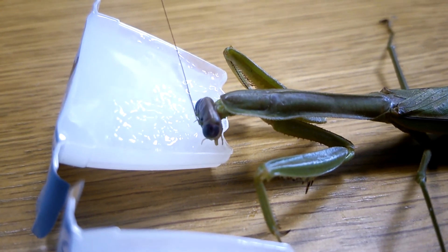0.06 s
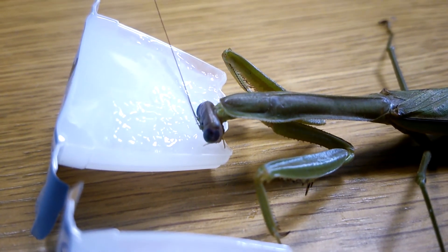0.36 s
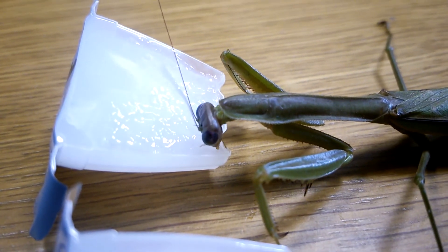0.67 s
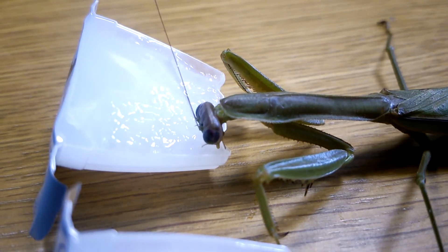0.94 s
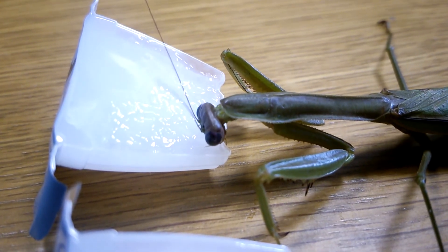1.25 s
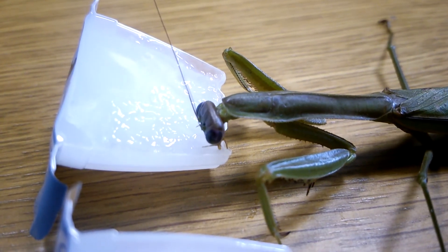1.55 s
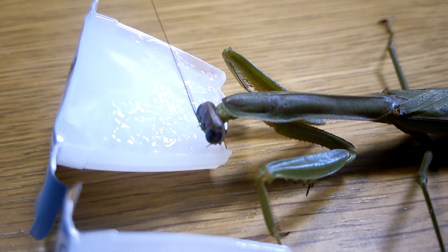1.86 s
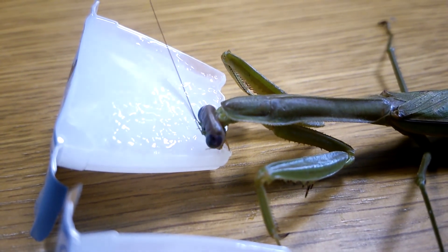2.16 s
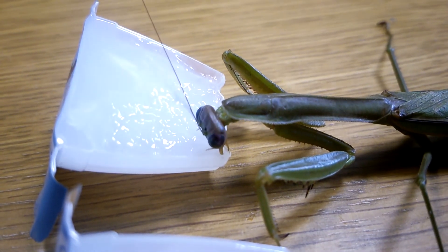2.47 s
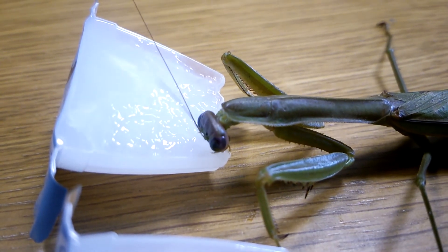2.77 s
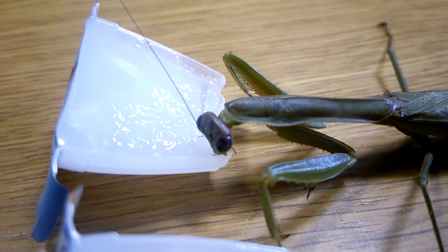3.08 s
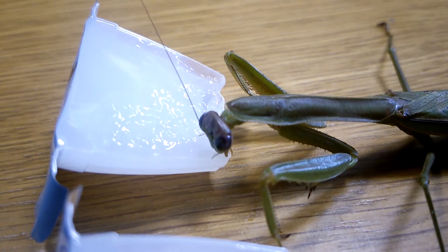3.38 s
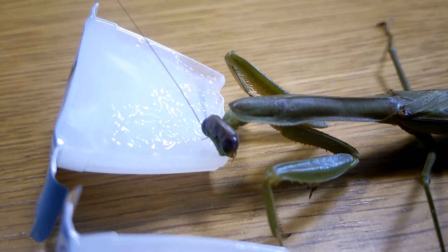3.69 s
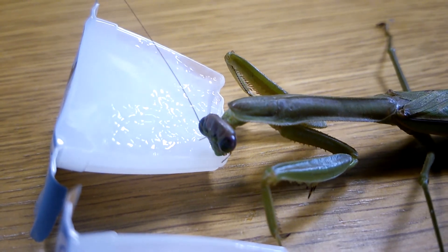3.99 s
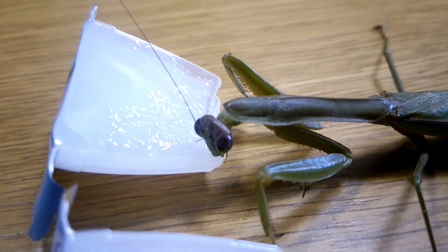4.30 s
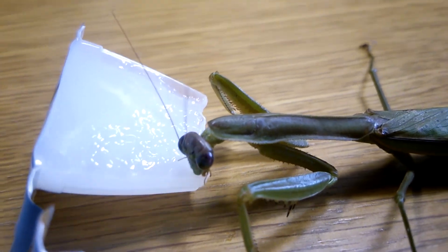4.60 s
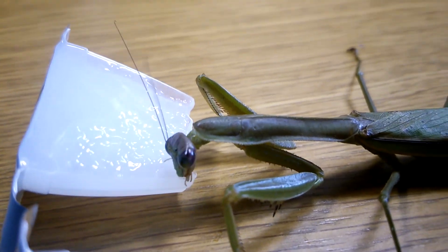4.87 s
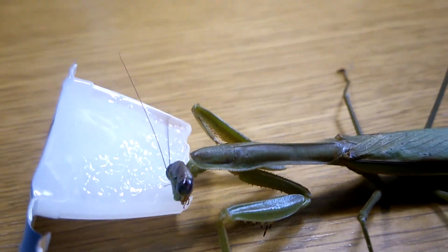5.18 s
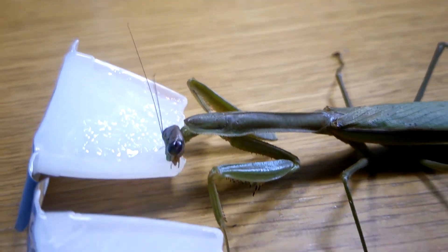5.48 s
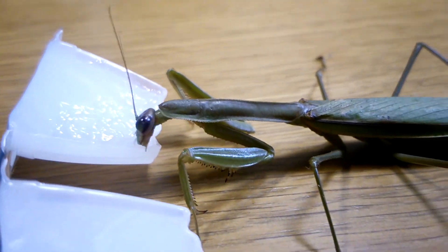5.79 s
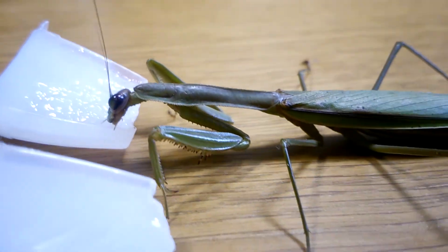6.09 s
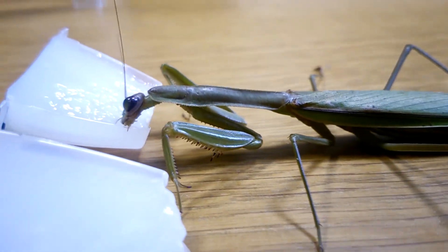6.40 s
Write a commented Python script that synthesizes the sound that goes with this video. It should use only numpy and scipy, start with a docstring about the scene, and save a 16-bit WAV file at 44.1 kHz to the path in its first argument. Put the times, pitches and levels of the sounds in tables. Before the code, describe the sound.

Small, crisp clicks come in pairs, with gaps between them, as an insect bites a plastic cup on a table, heard close up over faint indoor hum and hiss. After about four seconds, handling noise takes over on the phone's microphone: muffled knocks, a growing rumble, ticking creaks and a sharp snap from the case, then two soft finger slides.

```python
"""Pairs of dry clicks in a quiet, humming room: a mantis chews a plastic cup on a wooden table.
Each bite catches, grinds and breaks free; cup, table and walls echo it.
Then the hand holding a phone shifts: the grip rumbles and thumps, the case sticks, slips and snaps,
and a finger slides twice beside the left microphone."""
import sys
import numpy as np
from scipy import signal
from scipy.fft import rfft, irfft, next_fast_len
from scipy.io import wavfile

SR = 44100
rng = np.random.default_rng(int(sys.argv[2]) if len(sys.argv) > 2 else 0)


def int16_out(signal):
    """Quantize to a 16-bit WAV file."""
    q = np.round(np.clip(np.atleast_2d(signal).T, -1, 1) * 32767)
    wavfile.write(sys.argv[1], SR, q.astype(np.int16))


N = 284445
TIME = np.arange(N) / SR


def amp(db):
    """Decibels to gain."""
    return np.exp(np.asarray(db) * np.log(10) / 20)


def unit_rms(x):
    """Scales x so its stronger channel has an rms of one."""
    return x / np.sqrt(np.mean(x ** 2, -1).max() + 1e-20)


def add(mix, start_s, sound):
    """Adds a stereo sound into the mix."""
    part = mix[:, max(round(start_s * SR), 0):][:, :sound.shape[1]]
    part += sound[:, :part.shape[1]]


def convolve(x, response):
    """Filters each channel with its response."""
    return signal.oaconvolve(x, response, axes=1)[:, :N]


def gains(colour, hz):
    """Stereo gains at hz. Each row of a colour: frequency in Hz, left level in dB, right level in dB."""
    knots_hz, *sides = np.transpose(colour)
    return amp([np.interp(np.log(abs(hz) + 1), np.log(knots_hz + 1), side) for side in sides])


def tilted(colour, db_per_oct, pivot_hz=6000):
    """A colour made brighter or duller."""
    return [(hz, *(np.array(sides) + db_per_oct * np.log2(hz / pivot_hz))) for hz, *sides in colour]


def wander(rate_hz):
    """Random drift, unit rms."""
    steps = rng.standard_normal(4096)
    return unit_rms(np.interp(2 * rate_hz * TIME, np.arange(len(steps)), steps))


def noise(colour, shared=0., grain_db=0.):
    """Coloured stereo noise; grain_db makes its tiny impacts uneven."""
    size = next_fast_len(N, True)
    white = rng.standard_normal((2, size))
    grain = amp(grain_db * np.minimum(rng.exponential(1, size), 6))
    left, other = rfft(white * grain)
    hz = np.fft.rfftfreq(size, 1 / SR)
    coherence = np.clip(shared, 0, 1) / (1 + (hz / 900) ** 2)  # only long waves reach both sides alike
    pair = np.array([left, coherence * left + np.sqrt(1 - coherence ** 2) * other])
    return unit_rms(irfft(pair * gains(colour, hz), size)[:, :N])


def ring(colour, size=2048):
    """Minimum-phase stereo response of a body to a sharp blow, unit peak."""
    log_gain = np.log(gains(colour, np.fft.fftfreq(size, 1 / SR)))
    spectrum = np.exp(np.conj(signal.hilbert(log_gain)))
    response = np.fft.ifft(spectrum).real[:, :size // 2]
    return response / abs(response).max()


def scatter(decay_s, size=2048):
    """Dying spray of tiny impulses, unit energy per channel."""
    spray = rng.standard_normal((2, size)) * np.exp(-np.arange(size) / SR / decay_s)
    return spray / np.linalg.norm(spray, axis=1, keepdims=True)


def strokes(rows, attack_s, release_s):
    """Envelope of strokes that swell, hold and die away, summed in power."""
    power = np.zeros(N)
    for start_s, length_s, db in rows:
        t = TIME - start_s
        rise = np.clip(t / attack_s, 0, 1)
        fall = np.exp(-np.maximum(t - length_s, 0) / release_s)
        power += (amp(db) * rise * fall) ** 2
    return np.sqrt(power)


def cavities(x):
    """Cavities behind the microphone ports hold back sound near their pitch: clicks chirp and ring on."""
    # Each row: centre in Hz, width in Hz, left and right depth (1 swallows the tone, 2 returns it late).
    resonances = [(2360, 380, 1.7, 1.8), (4110, 550, 1.4, 1.72), (4015, 55, 0.34, 2.8),
                  (5880, 1050, 1.9, 1.52), (10700, 3800, 1.96, 1.91)]
    for hz, width_hz, *depths in resonances:
        held = signal.lfilter(*signal.iirpeak(hz, hz / width_hz, fs=SR), x + 1e-18)
        x = x - np.clip(depths, 0, 2)[:, None] * held
    return x


def room(floor_db=-57.0, waver_db=3.0):
    """Room noise, hiss, wavering hum of mains appliances and a faint tone that comes and goes."""
    # Noise colour and hum partials. Each row: frequency in Hz, left and right level in dB.
    floor_colour = [(20.3, -2.5, -5), (56, -14, -4.5), (89, -23, -28), (139, -32.5, -23.5),
                    (198, -32.5, -33.5), (272, -31, -29.5), (313, -27, -23.5), (368, -32.5, -30.5),
                    (463, -33.5, -38), (810, -38, -34.5), (1275, -46.5, -41.5), (3540, -46, -46.5),
                    (7600, -45.5, -47), (7800, -36, -45.5), (8250, -45.5, -48), (11200, -46.5, -41),
                    (15200, -48, -48.5)]
    hum_partials = [(120.6, -71.5, -65.5), (188, -94, -90.5), (239, -85.5, -77), (358.4, -92.5, -84.5),
                    (480, -91, -88), (535, -99, -95), (658, -99, -88)]
    # Faint tones. Each row: start in seconds, length in seconds, level in dB, pitch in Hz.
    drones = [(1.424, 0.36, -76.5, 297), (2.114, 0.086, -77, 316), (2.31, 0.195, -72, 312.6),
              (3.577, 0.67, -76.5, 296.8)]
    out = amp(floor_db) * noise(floor_colour, shared=0.49)
    drift_rad = 0.51 * wander(4.9)
    for hz, left_db, right_db in hum_partials:
        tone = np.sqrt(2) * np.sin(2 * np.pi * (hz * TIME + rng.random()) + drift_rad)
        out += amp([[left_db], [right_db]]) * tone * amp(waver_db * wander(6.1))
    for *swell, hz in drones:
        tone = np.sqrt(2) * np.sin(2 * np.pi * hz * TIME + 1.17 * wander(11))
        out += strokes([swell], attack_s=0.039, release_s=0.02) * tone
    return out


def unrest():
    """Hand motion as a gain: nearly still, then a shift of grip."""
    # Each row: time in seconds, level in dB.
    motion = [(0.0, -60), (0.36, -60.5), (1.26, -65.5), (1.76, -60), (2.22, -68), (2.45, -56.5),
              (2.95, -66), (3.3, -60.5), (3.75, -56), (3.87, -64), (4.04, -55), (4.31, -44.5), (4.67, -43),
              (4.85, -44), (5.46, -51), (5.6, -37), (5.84, -36.5), (6.34, -43.5), (6.45, -49)]
    return amp(np.interp(TIME, *np.transpose(motion)))


def grip_rumble(shared):
    """Low noise of the grip on the phone."""
    # Each row: frequency in Hz, left and right level in dB.
    colour = [(20.2, 0, -20), (40.3, -0.5, -26.5), (69, -5.5, -29.5), (120, -16.5, -23.5),
              (185, -29, -43.5), (297, -35.5, -45.5), (690, -51, -72), (2000, -67, -80)]
    return noise(colour, shared)


def skin_judder():
    """Skin judders on the case."""
    # Each row: start in seconds, length in seconds, level in dB.
    judders = [(.21, 0.045, -51), (.4, 0.058, -50), (1.68, 0.04, -54), (1.9, 0.032, -58),
               (2.67, 0.051, -59), (3.3, .08, -57), (4.07, 0.07, -53), (4.41, 0.11, -42),
               (4.52, 0.058, -39), (4.69, 0.053, -42.5), (5.15, 0.049, -40.5), (5.5, 0.064, -34.5),
               (5.6, 0.494, -44.5)]
    # Each row: frequency in Hz, left and right level in dB.
    colour = [(50, 0.5, -16), (119, 2, -30), (200, -1, -27), (236, -10, -22), (288, -11.5, -26.5),
              (447, -32.5, -32.5), (1220, -48, -54.5), (4000, -70, -70)]
    return strokes(judders, attack_s=0.038, release_s=0.034) * noise(colour, shared=0.48)


def finger_slide():
    """A finger rubs beside the left microphone."""
    # Each row: start and length in seconds, level in dB, rise and fade in seconds.
    slides = [(5.635, 0.086, -55.5, 0.045, 0.029), (5.677, 0.064, -47, 0.064, .04),
              (5.74, .095, -53.5, 0.032, .011), (5.939, 0.22, -52.5, 0.005, 0.021),
              (5.986, 0.074, -54, 0.042, .015), (6.099, 0.055, -55.5, 0.032, 0.044)]
    # Each row: frequency in Hz, left and right level in dB.
    colour = [(199, -27, -36), (400, -17, -42), (510, -2, -28), (690, -13.5, -33), (830, -9.5, -41),
              (1290, -15, -47), (2020, -14.5, -47), (3280, -19, -56), (3980, -28, -45), (5100, -24, -51),
              (5800, -30.5, -42), (7050, -32.5, -36), (12000, -28, -31), (15000, -41, -45)]
    envelope = sum(strokes([row], rise_s, fade_s) for *row, rise_s, fade_s in slides)
    return envelope * noise(colour, grain_db=1.5)


def hand(rumble_db=7.0, drag_db=-53, tremor_hz=7, tremor_db=3.5, flutter_hz=45, flutter_db=1.4):
    """The unsteady hand rumbles and rubs on the case; each kind of friction is enveloped noise."""
    # Friction strokes. Each row: start in seconds, length in seconds, level in dB.
    brushes = [(0, 1.08, -70), (1.68, 0.076, -68.5), (1.98, 0.088, -66.5), (2.5, 0.23, -69),
               (3.19, 0.49, -68), (3.75, 1.63, -69.5), (4.63, 1.8, -67.5), (5.5, 0.22, -61.5),
               (6.0, 0.15, -57.5)]  # airy, from the moving hand
    glides = [(4.655, 0.054, -66), (4.96, .09, -63), (5.05, 0.1, -59), (5.405, .09, -61),
              (5.55, 0.41, -64.5), (5.71, 0.022, -62), (5.97, 0.29, -58.5)]  # fine hiss on the smooth case
    scuffs = [(.23, 0.083, -72.5), (.41, 0.12, -71), (1.7, 0.08, -77), (2.42, 0.12, -74.5),
              (2.67, 0.12, -75.5), (3.2, 0.2, -76.5), (4.211, 0.013, -64), (4.38, 0.54, -74.5),
              (4.645, 0.1, -72), (4.96, 0.2, -69), (5.138, 0.0037, -48), (5.48, 0.042, -54)]  # the palm tightens
    scrapes = [(4.95, 0.042, -64.5)]  # thin, ahead of the creaks
    rasps = [(5.054, 0.022, -58), (5.108, 0.024, -65)]  # the case starts to give
    # Their colours. Each row: frequency in Hz, left and right level in dB.
    air = [(500, -18, -13), (1300, -9.5, -11.5), (3970, -13, -13.5), (6600, -9.5, -11), (7900, -2, -6.5),
           (8830, -7, -8.5), (11540, -12.5, 0.5), (12900, -10, -8), (15500, -24, -6)]
    fizz = [(5000, -35, -21), (8500, -22, -8.5), (11270, -16, 2.5), (13500, -21, -3), (15500, -22, -9.5)]
    palm = [(150, -9, -4.5), (540, 2.5, 2), (805, -1.5, 5), (1145, -5, -3.5), (1730, -17, -7.5),
            (2200, -4.5, -7), (3600, -15.5, -16), (4370, -8, -11), (7950, -20, -13.5), (15100, -22, -16)]
    thin = [(1490, -30, -30), (2070, -1, 4), (2530, 0.5, 0), (3320, -31, -15)]
    grit = [(600, -21, -21), (1070, -5, 3), (1610, -14, -14), (2400, -11, -5), (3640, -16, -16),
            (4340, 1, -11), (5600, -8, -8), (7500, -18, -23)]
    motion = unrest() * amp(tremor_db * wander(tremor_hz))
    rumble = amp(rumble_db) * motion * grip_rumble(shared=0.67)
    judder = skin_judder()
    slide = finger_slide()
    brush = strokes(brushes, attack_s=0.028, release_s=0.072) * noise(air, grain_db=2.0)
    glide = strokes(glides, attack_s=0.016, release_s=0.11) * noise(fizz, grain_db=3.0)
    palm_gain = strokes(scuffs, attack_s=0.0023, release_s=0.011) + amp(drag_db) * np.sqrt(motion)
    scuff = palm_gain * noise(palm, shared=0.53, grain_db=3.0)
    scrape = strokes(scrapes, attack_s=0.0057, release_s=0.047) * noise(thin, grain_db=3.0)
    rasp = strokes(rasps, attack_s=0.0041, release_s=0.009) * noise(grit, shared=.5, grain_db=5)
    flutter = amp(flutter_db * wander(flutter_hz))
    return rumble + judder + glide + (slide + brush + scuff + scrape + rasp) * flutter


def push(width_s):
    """Air pressure as a fingertip presses and lets go, unit peak."""
    u = 2 * np.arange(6000) / SR / width_s
    shape = u ** 2 * (1 - u / np.pi) * np.exp(-u)
    return shape / shape.max()


def finger_knocks(flesh_hz=480, wobble_db=-15, wobble_s=0.039, far_port_db=-31,
                  nudges_per_s=7, nudge_s=0.016, nudge_db=14):
    """Fingertips push air at the left port and leave the grip wobbling; soft flesh passes no treble."""
    # Each row: time in seconds, level in dB, pulse width in seconds.
    knocks = [(0.297, -35, 0.0066), (0.426, -33, 0.0074), (0.516, -41, 0.0062), (0.928, -37, 0.015),
              (1.912, -38, 0.016), (2.048, -36, 0.014), (2.705, -35, .011), (2.819, -39.5, 0.012),
              (3.208, -37.5, 0.0095), (3.361, -40, 0.0069), (3.62, -38.5, 0.0088), (3.982, -39.5, 0.012),
              (4.215, -18, 0.0056), (4.311, -25, 0.012), (5.128, -17.5, 0.0036), (5.159, -17, 0.0078),
              (5.176, -23.5, 0.0029), (5.193, -26.5, 0.0034), (5.274, -24, 0.003), (5.405, -25, 0.0036),
              (5.428, -20.5, 0.0028), (5.485, -22.5, 0.0011), (5.516, -10.5, 0.004), (5.74, -21, 0.0036),
              (5.764, -25, 0.0032), (5.814, -23, .003), (5.853, -26, 0.0028), (5.872, -17, 0.0036),
              (5.935, -24, 0.0025), (5.967, -24, .003), (6.004, -19.5, 0.0036), (6.037, -18, 0.0046),
              (6.055, -22.5, .003)]
    pushes, wobble = np.zeros((2, N)), np.zeros(N)
    ports = amp([[0], [far_port_db]])
    for at_s, db, width_s in knocks:
        add(pushes, at_s, amp(db) * ports * push(width_s))
        wobble += amp(db + wobble_db) * np.exp(-abs(TIME - at_s) / wobble_s)
    nudges = (rng.random(N) < nudges_per_s / SR) * rng.uniform(-1.17, 1, N)
    pushes += convolve(amp(nudge_db) * ports * unrest() * nudges, push(nudge_s)[None])
    thumps = signal.sosfilt(signal.butter(4, flesh_hz, fs=SR, output="sos"), pushes)
    return thumps + wobble * grip_rumble(shared=0.59)


def phone_bumps():
    """Dull bumps briefly shake the whole phone."""
    # Each row: start in seconds, length in seconds, level in dB.
    bumps = [(4.21, 0.022, -47.5), (5.335, 0.032, -48)]
    # Each row: frequency in Hz, left and right level in dB.
    colour = [(80, -14, -11), (202, 0, 5), (313, 1.5, 1.5), (495, -7, -6), (680, -28, -26),
              (1500, -61, -64)]
    return strokes(bumps, attack_s=.003, release_s=.01) * noise(colour, shared=0.89)


def phone_case(snap_s=5.5155, snap_db=1, panel_db=-17, chatter_s=0.0022, afterslip_s=.006,
               afterslip_db=-15, ring_delay_s=0.000748, buzz_rad=0.65, buzz_hz=130):
    """The case sticks and slips ever harder, flexing its panel, then snaps; its hollow body rings."""
    # Slips. Each row: time in seconds, level in dB, relative chatter and panel flex in dB.
    creaks = [(4.6583, -37, -2, -6), (5.0968, -32.5, 2, -1), (5.1118, -28.5, 4.5, -6),
              (5.1183, -23.5, 3, -5), (5.124, -29, -6, -6), (5.1362, -28, 3.5, -3),
              (5.4116, -35.5, -4, -13), (5.432, -37, -2, -15), (5.442, -37, -4, -18),
              (5.4646, -23, -10, -6.5), (5.474, -19.5, -1, -5), (5.479, -25.5, 4, 0), (5.482, -26, -7, 7),
              (5.4851, -11.5, -2.5, -0.5), (5.494, -20, -1.5, -7), (5.498, -16, -18.5, -17),
              (5.51, -17.5, -12, 3), (5.513, -13.5, -11, -20)]
    # Each row: frequency in Hz, left and right level in dB.
    slip_colour = [(3600, -31, -25), (4350, -18, -10), (5600, -21, -7.5), (7500, -19, -6.5),
                   (8800, -20, -9), (11100, -27, 4), (12000, -28.5, 2), (14500, -33, -8),
                   (16300, -41, -22.5)]
    panel_colour = [(300, -0.5, -19), (1500, -2, -11), (3080, -3, 2.5), (4000, -23, -13),
                    (8000, -42.5, -37)]
    snap_colour = [(200, -7, -31), (523, -7.5, -11.5), (760, -10, -24), (1460, -9.5, -20),
                   (2300, -34.5, -30), (3080, -27, -28), (3500, -16, -11.5), (4330, -23, -14),
                   (4750, -33, -15.5), (5350, -11.5, -5), (6500, -13, -8.5), (7050, -24, -9.5),
                   (7960, -22, -8.5), (9800, -33, 2), (11300, -34, 7), (12600, -32, -15), (14100, -28, -10),
                   (16100, -32, -28.5)]
    # Each row: frequency in Hz, left and right level in dB, decay in seconds.
    hollow_modes = [(435, -15, -40, 0.0028), (1140, -24, -29.5, 0.0013), (1370, -20.5, -29, 0.0013),
                    (3480, -19.5, -28.5, 0.00066), (4086, -58.5, -41, 0.0089)]
    slips, flexes, snap = np.zeros((3, 2, N))
    for at_s, db, chatter_db, flex_db in creaks:
        afterslip = afterslip_s * (.5 + rng.random()), afterslip_db
        for delay_s, weaker_db in (0, 0), afterslip:
            slip = amp(chatter_db) * scatter(chatter_s)
            slip[:, 0] += 1
            add(slips, at_s + delay_s, amp(db + weaker_db) * slip)
            add(flexes, at_s + delay_s, amp(db + weaker_db + flex_db + panel_db) * slip)
    add(snap, snap_s, amp(snap_db) * ring(snap_colour))
    out = cavities(snap + convolve(slips, ring(slip_colour)) + convolve(flexes, ring(panel_colour)))
    t = np.arange(4096) / SR
    for hz, left_db, right_db, decay_s in hollow_modes:
        phase = 2 * np.pi * hz * t + buzz_rad * wander(buzz_hz)[:len(t)]  # the loose case buzzes
        mode = np.sin(phase) * np.exp(-t / decay_s)
        add(out, snap_s + ring_delay_s, -amp([[left_db], [right_db]]) * mode)
    return out


def bite_echoes(blows, table_db=-7, table_s=0.0051, room_db=-8.5, room_s=0.072):
    """Cup and table scatter each click briefly, the walls for longer."""
    # Each row: frequency in Hz, left and right level in dB.
    colour = [(800, -27, -21), (1820, -18, -21), (2770, 1, -2), (3430, -4.5, -4), (4120, -3, -2),
              (4730, -7, -2.5), (5900, -3.5, -5), (8000, -0.5, -5.5), (11200, -5, 5), (12800, -4, 3.5),
              (15400, -10, -10)]
    tail = amp(table_db) * scatter(table_s, size=20000) + amp(room_db) * scatter(room_s, size=20000)
    return convolve(convolve(blows, tail), ring(colour))


def mantis_jaws(splinter_s=0.002, catch_splinter_db=-3, release_splinter_db=0, facing_db=-5,
                build_s=0.022, crumble_s=0.013, grind_db_per_oct=-3, nibble_s=0.0059, lag_s=.0005):
    """The jaws catch with a click, grind ever harder and break free with a second click."""
    # Each row: catch and release time in seconds, their levels in dB, their tilts in dB per octave,
    # grinding level in dB.
    bites = [(0.017, 0.041, -28, -29.5, 0.46, -4, -58.5), (0.513, 0.5254, -22, -24, .5, -1, -60),
             (1.3811, 1.3939, -23, -25, -0.15, -2.3, -59), (1.9379, 1.954, -25, -29, -.5, -2, -59),
             (2.4456, 2.4768, -30, -29.5, 1, -4.5, -54), (3.384, 3.409, -25.5, -30, 2, -3, -61)]
    # Mouthpart ticks between bites. Each row: time in seconds, level in dB.
    nibbles = [(.94, -44.5), (1.115, -45), (1.256, -50), (3.99, -46)]
    # Each row: frequency in Hz, left and right level in dB.
    click_colour = [(905, -23, -18), (1980, -32, -34), (2350, -6, -13), (2820, -0.5, -10), (3320, -11, -12),
                    (3560, -19, -27), (4180, -9.5, 0.5), (4680, 2.5, -10), (5100, -8, -2), (6000, 4, -8.5),
                    (8200, -9, -8), (9800, 0, -1), (10600, -9, -1.5), (11250, -12, 7.5), (12400, -24, -8),
                    (14700, -23, -5.5), (16500, -32, -12.5)]
    clicks, ticks, blows = np.zeros((3, 2, N))
    grind_gain = np.zeros(N)
    for catch_s, release_s, catch_db, release_db, catch_tilt, release_tilt, grind_db in bites:
        catch = catch_s, catch_db, catch_tilt, catch_splinter_db
        release = release_s, release_db, release_tilt, release_splinter_db
        for at_s, db, tilt, splinter_db in catch, release:
            # cleaner at the left microphone, which faces the jaws
            crack = amp([[splinter_db + facing_db], [splinter_db]]) * scatter(splinter_s)
            crack[:, 0] = 1
            add(clicks, at_s, amp(db) * convolve(crack, ring(tilted(click_colour, tilt))))
            add(blows, at_s, amp(db) * np.ones((2, 1)))
        t = TIME - release_s
        swell = np.exp(-abs(t) / np.where(t < 0, build_s, crumble_s))
        grind_gain += amp(grind_db) * (TIME > catch_s) * swell
    for at_s, db in nibbles:
        add(ticks, at_s, amp(db) * scatter(nibble_s))
    grinding = grind_gain * noise(tilted(click_colour, grind_db_per_oct), grain_db=3.5)
    direct = cavities(clicks + convolve(ticks, ring(click_colour)) + grinding)
    direct[1] = np.roll(direct[1], round(lag_s * SR))  # the right microphone is farther away
    return direct + bite_echoes(blows)


def scene():
    """Chewing mantis, hand on the phone, room."""
    return mantis_jaws() + phone_case() + finger_knocks() + phone_bumps() + hand() + room()


def record(dry):
    """Full scale clips the snap; a 16 kHz low-pass follows."""
    lowpass = signal.firwin(301, 16000, window=("kaiser", 9), fs=SR)
    return signal.oaconvolve(np.clip(dry, -1, 1), lowpass[None], "same")


dry = scene()
out = record(dry)
int16_out(out)
```